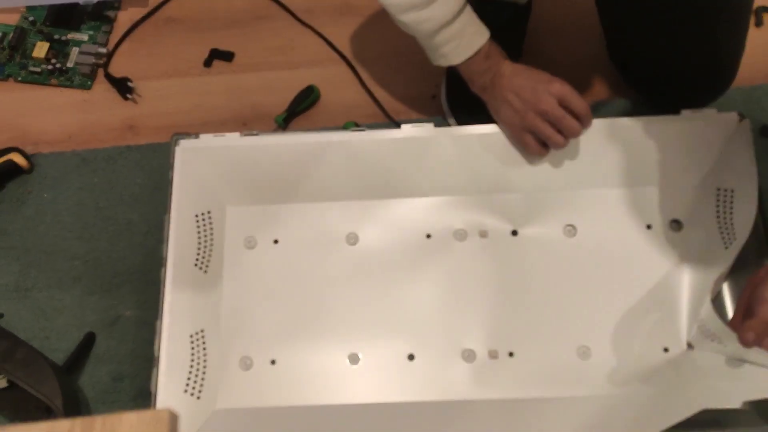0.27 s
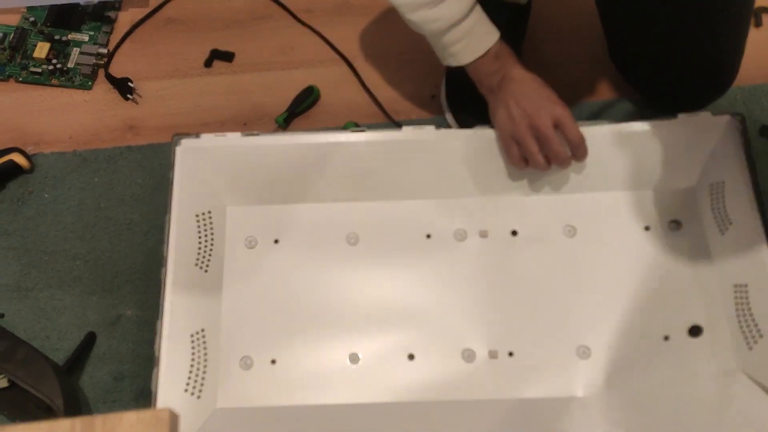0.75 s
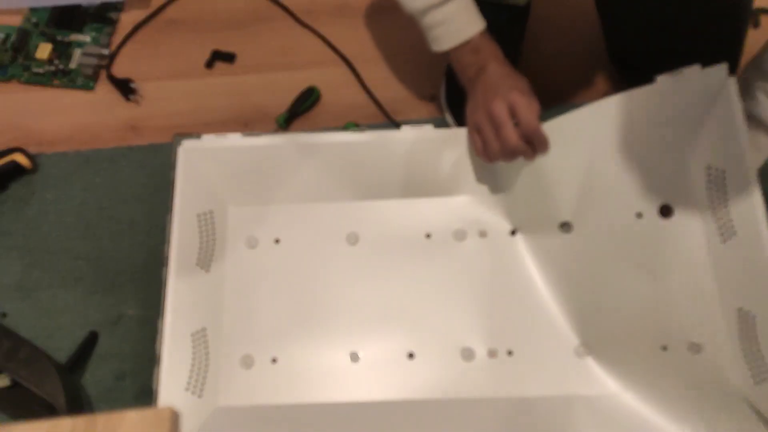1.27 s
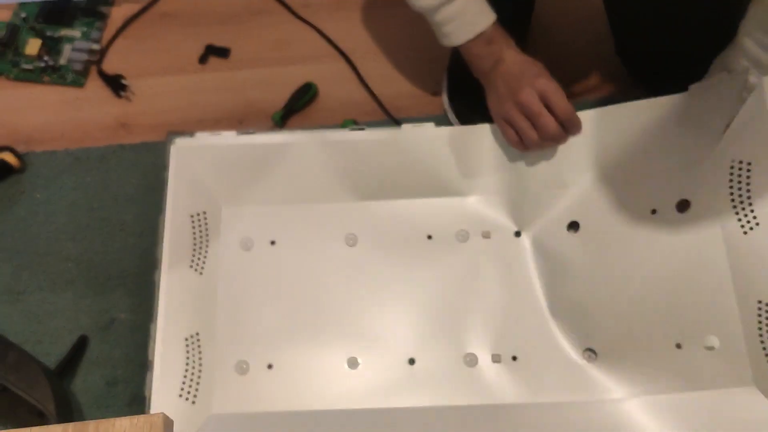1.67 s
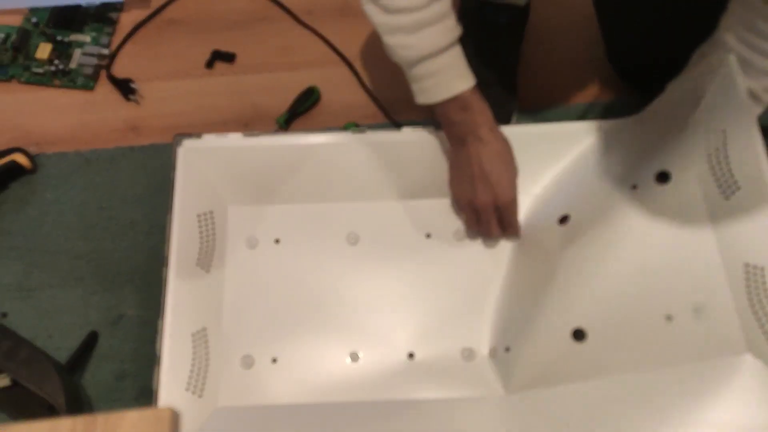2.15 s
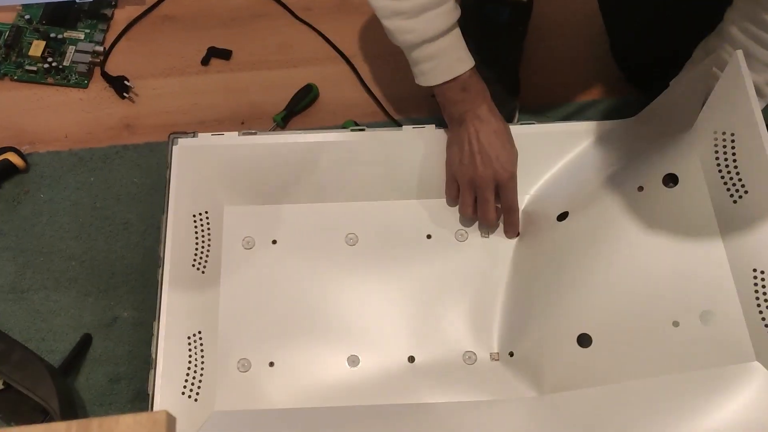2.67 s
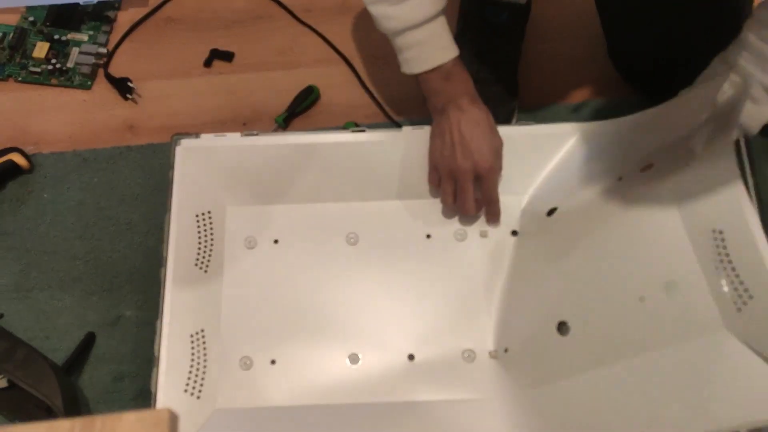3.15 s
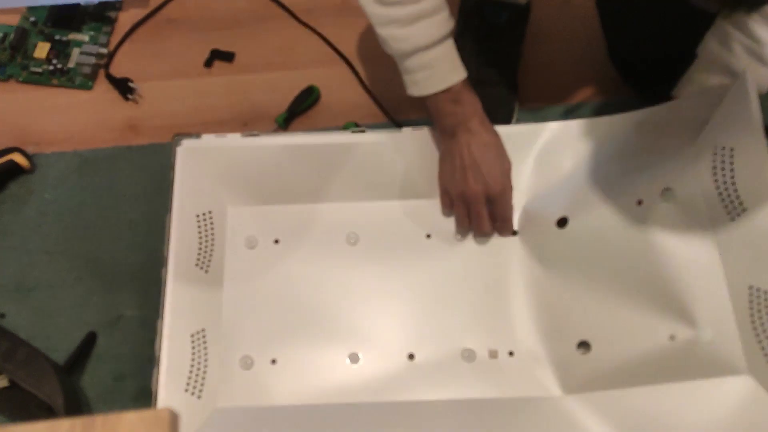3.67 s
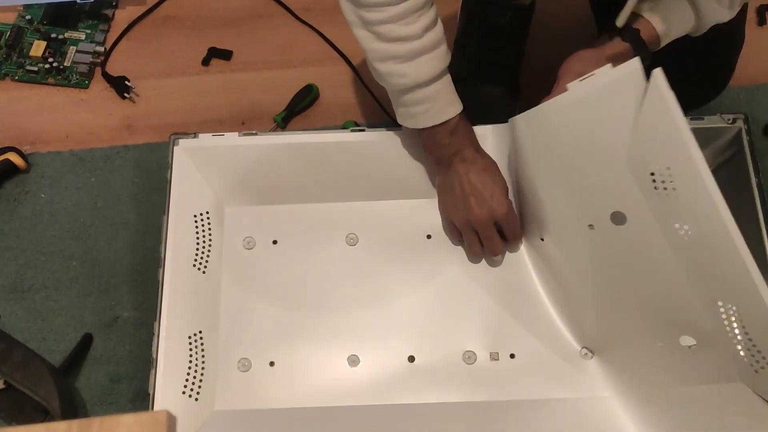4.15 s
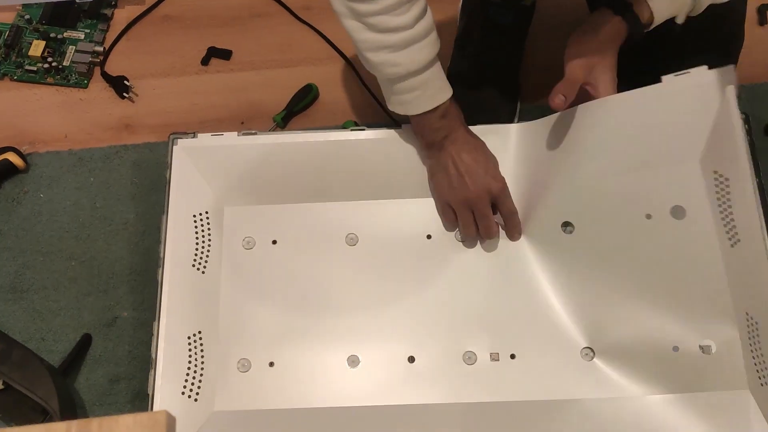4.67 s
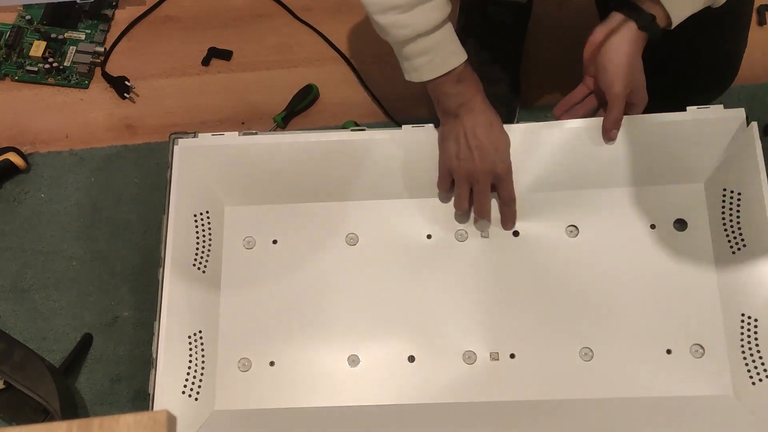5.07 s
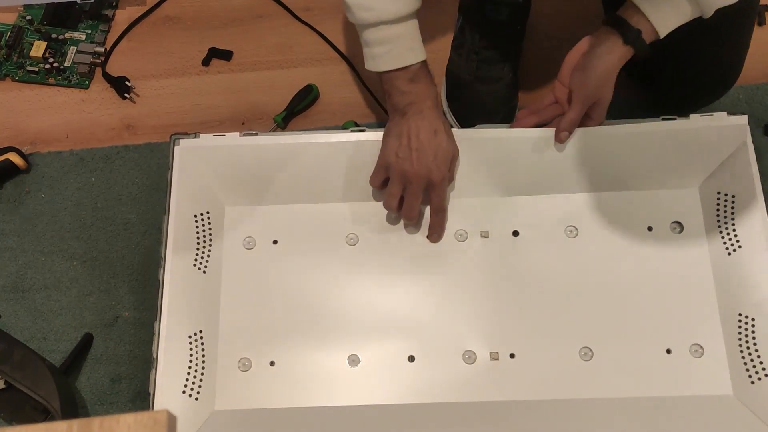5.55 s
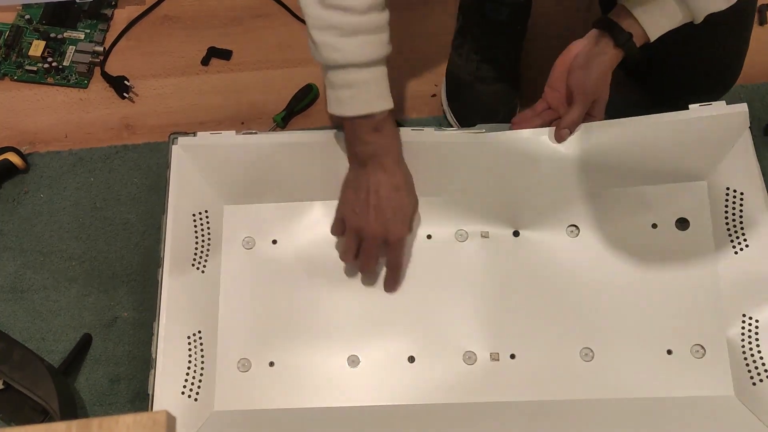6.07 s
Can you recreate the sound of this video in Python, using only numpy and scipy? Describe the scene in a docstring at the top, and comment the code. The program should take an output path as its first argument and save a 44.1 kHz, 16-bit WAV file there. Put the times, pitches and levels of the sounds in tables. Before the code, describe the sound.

Very close stereo microphones in a small, still room with a short diffuse tail; soft air noise lies underneath. A thin moulded plastic sheet is lifted and flexed by hand. Until 0.4 s there are only faint ticks and slight rustling. From 0.45 to 0.7 s it buckles in quick sharp crackles, then from 0.95 to 1.25 s in a dense cluster of hard, hollow snaps, strongest near 1.2 s. Another tight volley comes at 1.75-1.9 s, with separate cracks around 2.1, 2.2 and 2.55 s. Flapping, creaks and thin rim hisses fill between. From 2.9 to 3.5 s only small soft pops remain. A fast crackling fold runs through at 3.8-3.9 s, then a lull; brief crackles return at 4.6-4.9 s. Quiet ticks follow at 5.2 s, a soft knock near 5.8 s, and a clearer snap at 6.05 s before it settles.

```python
"""Close by in a small room with still air, two hands peel a thin moulded plastic sheet off its metal tray.
After a few faint ticks it buckles in dense clusters of hard snaps, each sending bending waves between its edges.
Sparser, mostly softer snaps follow as it is flexed and laid down; a late fold runs through it as a fast crackle.
Throughout it flaps and creaks, its rim slides with a fine hiss and now and then it knocks softly.
The room answers with a short diffuse tail, and two close microphone ports pick up the whole."""
import sys
import numpy as np
from scipy import signal
from scipy.fft import rfft, irfft, next_fast_len
from scipy.io import wavfile

SR = 44100
rng = np.random.default_rng(int(sys.argv[2]) if len(sys.argv) > 2 else 0)


def generate_wav(signal):
    """Clip the signal to [-1, 1] and save it as 16-bit WAV at the path in sys.argv[1]."""
    frames = np.transpose(np.atleast_2d(signal))
    scaled = np.clip(frames, -1, 1) * 32767
    pcm = np.round(scaled).astype(np.int16)
    wavfile.write(sys.argv[1], SR, pcm)


N = 277830  # length in samples

# Colour of the still air. Each row: frequency in Hz, relative level in dB.
AIR_COLOUR = [(25, -14), (60, -14), (130, -4), (280, -3.5), (700, -9), (1900, -7.5), (2800, -16),
              (4200, -21.5), (6800, -17.5), (9500, -25), (11300, -25), (12300, -59)]
# Decay of the room. Each row: frequency in Hz, time to fall by 60 dB in s.
ROOM_DECAY = [(150, 0.3), (400, 0.68), (1040, 0.23), (2760, .42), (7280, 0.34), (12000, 0.13)]
# Width of scattered sound between the microphone ports. Each row: frequency in Hz, gain of the side signal in dB.
PORT_WIDTH = [(60, -1), (130, -1.5), (300, -16.5), (700, -5.5), (1400, -3), (2800, 0), (6000, -1)]
# Standing waves of the whole sheet. Each row: frequency in Hz, relative level in dB.
SHEET_MODES = [(206, 5), (343, -5), (446, -6), (537, -5), (672, -1), (745, 1), (878, 3), (983, 0),
               (1176, 1)]
# How hard the hands work the sheet. Each row: time in s, relative bending in dB, relative sliding in dB.
HAND_EFFORT = [(0.0, -56, -59.5), (0.31, -56.5, -61.5), (0.41, -63.5, -69), (0.5, -42.5, -57),
               (1.3, -51, -60.5), (1.7, -55, -59.5), (2.05, -48, -58), (2.47, -52, -64.5), (2.7, -48, -63),
               (2.9, -53.5, -59), (3.75, -52, -60), (4.22, -59.5, -56.5), (4.32, -64, -76),
               (4.55, -63.5, -72), (4.8, -47.5, -64), (5.1, -59.5, -70), (5.25, -52.5, -57.5),
               (5.42, -70.5, -63), (5.68, -63, -63.5), (5.82, -56, -58.5), (6.29, -59, -58)]
# The rim scrapes along the tray. Each row: start in s, length in s, peak level in dB.
RIM_SCRAPES = [(0.478, 0.12, -44), (0.995, 0.17, -45), (1.477, 0.2, -54), (2.772, 0.12, -50),
               (3.777, 0.14, -42), (4.82, 0.26, -54)]
# Colours of the flapping, the creaking and the sliding. Each row: frequency in Hz, relative level in dB.
FLAP_COLOUR = [(30, -23.5), (90, -14), (160, -8.5), (210, -1), (350, 2.5), (550, -3), (900, -11.5),
               (3000, -67.5)]
CREAK_COLOUR = [(100, -45), (350, -6), (600, 0), (1200, 2.5), (2100, -0.5), (2800, -14), (4200, -20.5),
                (9000, -58)]
SLIDE_COLOUR = [(800, -28), (2500, 5), (4200, -3.5), (5500, 3.5), (7000, 7.5), (8200, -3), (9800, -17),
                (11400, -11), (12200, -59), (15000, -31)]
# Soft knocks of fingers and rim on the sheet. Each row: start in s, relative level in dB, pitch in Hz.
SOFT_KNOCKS = [(0.901, -41, 340), (1.372, -38, 268), (1.6, -47, 422), (2.737, -46.5, 546),
               (3.284, -53, 252), (3.647, -47, 328), (3.71, -48.5, 230), (5.221, -46.5, 320),
               (5.774, -34, 379), (5.932, -48, 335), (5.964, -44, 336)]
# Colour of a snap. Each row: frequency in Hz, relative level in dB.
SNAP_COLOUR = [(40, -32), (110, -19), (170, -17.5), (210, 0.5), (500, -0.5), (2050, -2), (2500, -8),
               (3200, -9.5), (4100, -18), (6800, -10.5), (8200, -23.5), (10000, -42), (11500, -38),
               (12300, -54), (15000, -60)]
# Ringing of gentle and hard buckles. Each row: relative level of the buckle in dB,
# ringing against the first pulse in dB.
BUCKLE_RINGING = [(-37, 6), (-13.5, 0)]
# Folds that travel in a run of buckles. Each row: start in s, length in s, relative level in dB,
# pitch of the bend in Hz, relative low thud in dB, relative crisp crack in dB.
TRAVELLING_FOLDS = [(0.443, 0.037, -34.5, 1560, -12.5, -29), (0.504, 0.054, -35, 1010, -4, -19),
                    (0.597, 0.055, -33, 1500, -19, -11.5), (3.804, 0.12, -20, 1460, -18, -26.5),
                    (4.631, 0.075, -25.5, 1700, -18, -31), (4.86, 0.062, -30.5, 1300, -14, -28.5)]
# Single buckles of the sheet. Each row: time in s, relative level in dB, pitch of the bend in Hz,
# relative low thud in dB, relative crisp crack in dB.
SINGLE_SNAPS = [(0.169, -40.5, 1270, -8, -32), (0.257, -46, 523, -9, -20), (0.497, -26.5, 720, -17, -21),
                (0.566, -16.5, 1260, -28, -11.5), (0.671, -27.5, 990, -38, -17),
                (0.776, -30.5, 1310, -8, -16.5), (0.879, -37, 1400, -19, -29), (0.903, -37, 1600, -11, -35),
                (0.961, -21.5, 1660, -19, -22.5), (1.021, -26, 1410, -10, -14),
                (1.032, -19.5, 1290, -12, -25.5), (1.169, -23.5, 1100, -42, -14),
                (1.179, -17.5, 1060, -14, -13.5), (1.192, -12.5, 1030, -10.5, -11),
                (1.245, -20.5, 990, -14.5, -22), (1.367, -33, 690, -7, -30), (1.602, -36.5, 790, -5.5, -19),
                (1.676, -40, 1650, 4, -28), (1.755, -36, 1100, 3, -21), (1.776, -24.5, 660, 1.5, -10),
                (1.783, -17, 1160, -11.5, -17.5), (1.858, -16.5, 1760, -15.5, -14),
                (1.871, -24.5, 1190, 1, -8), (1.888, -13, 1850, -21.5, -12.5), (1.901, -21, 1170, -26, -17),
                (2.067, -20, 1950, -19, -13), (2.209, -21.5, 710, -30.5, -24.5),
                (2.331, -37.5, 660, -11, -11), (2.489, -42.5, 860, -6, -41), (2.532, -31, 2140, -12, -8),
                (2.564, -18, 2000, -13, -8.5), (2.574, -23, 805, -22, -17), (2.952, -35, 710, -11, -40),
                (3.043, -40.5, 730, -25, -20), (3.112, -44.5, 1700, -15, -13), (3.173, -42.5, 744, -8, -36),
                (3.246, -36.5, 1980, -19, -15), (3.413, -31.5, 1710, -9, -53), (3.440, -37.5, 670, -8, -43),
                (3.787, -26.5, 1920, -11, -13.5), (3.917, -28.5, 940, -16, -38),
                (3.948, -28.5, 880, -14, -36), (4.380, -43, 755, -3.5, -48),
                (4.586, -41.5, 2000, -1.5, -33), (4.645, -22, 2010, -31, -22), (4.690, -26, 910, -22, -38),
                (4.737, -34, 960, -33, -13.5), (5.238, -35, 1850, -7, -24), (5.250, -40, 1300, 1, -33),
                (5.721, -31, 1340, -9.5, -31), (5.922, -39, 1300, -9, -48), (5.976, -30.5, 1260, -19, -23),
                (6.051, -22.5, 1740, -10.5, -11.5)]

AIR_DB = -68  # level ahead of the port gains
LEAD_S = .02  # how long a fold strains before it gives way
WIND_UP_S = .1  # how long before a buckle the unrest can begin
WIND_UP_T60, SETTLE_T60 = 0.097, 0.58  # s for 60 dB, up to a buckle and after it
EDGE_HZ = 15400  # upper band limit of the recorder


def gain_of(db):
    """Decibels to a factor."""
    return 10 ** (np.asarray(db) / 20)


def together(*levels_db):
    """The level of several unrelated parts, in dB: their powers add."""
    return 10 * np.log10(sum(gain_of(db) ** 2 for db in levels_db))


def evened(x):
    """Scales to rms 1."""
    return x / np.sqrt(np.mean(x ** 2) + 1e-20)


def unit(x):
    """Scales each row to energy 1."""
    return x / np.sqrt(np.sum(x ** 2, -1, keepdims=True) + 1e-20)


def read(points, hz):
    """Reads a table on a log-frequency axis."""
    f, value = np.transpose(points)
    return np.interp(np.log(hz + 1), np.log(f + 1), value)


def add(mix, s, sound):
    """Adds a sound to the mix at time s."""
    start = max(round(s * SR), 0)
    part = mix[:, start:][:, :sound.shape[1]]
    part += sound[:, :part.shape[1]]


def bins(size=2048):
    """The frequencies on which colours are drawn, in Hz."""
    return np.fft.rfftfreq(size, 1 / SR)


def coloured(x, db):
    """Causal minimum-phase filter of mean power gain 1, shaped by the given dB on bins()."""
    cepstrum = irfft(np.log(gain_of(db)))
    half = len(cepstrum) // 2
    # folding the cepstrum onto positive times makes the response causal
    cepstrum[1:half] *= 2
    cepstrum[half + 1:] = 0
    response = unit(irfft(np.exp(rfft(cepstrum))))
    return signal.oaconvolve(x, response[None], axes=1)[:, :x.shape[1]]


def echoes(length, per_s):
    """Sparse taps of random sign, for mid and side."""
    signs = rng.choice([-1., 1.], (2, length))
    return signs * (rng.random((2, length)) < per_s / SR)


def still_air():
    """The air of the place: steady coloured noise, independent in mid and side."""
    noise = rng.standard_normal((2, N))
    return gain_of(AIR_DB) * evened(coloured(noise, read(AIR_COLOUR, bins())))


def room(x, build_s=0.0017):
    """A diffuse tail that builds up quickly and dies band by band."""
    hz, t, z = signal.stft(echoes(SR * 3 // 4, 5000), SR, nperseg=256)
    decay = gain_of(-60 * t / read(ROOM_DECAY, hz)[:, None])
    z = z * decay * (1 - np.exp(-(t / build_s) ** 2))
    tail = unit(signal.istft(z, SR, nperseg=256)[1])
    return signal.fftconvolve(x[:1], tail, axes=1)[:, :N]


def standing(x, level_db=-15, t60_at_200=0.29):
    """The buckles leave standing waves in the sheet; higher ones die sooner."""
    t = np.arange(SR // 2) / SR
    ring = np.zeros(len(t))
    for hz, db in SHEET_MODES:
        fall_db = 60 * t / t60_at_200 * (hz / 200) ** 0.2
        ring += gain_of(db - fall_db) * np.sin(2 * np.pi * (hz * t + rng.random()))
    rung = signal.fftconvolve(x, ring[None], axes=1)[:, :N]
    return gain_of(level_db) * x.std() * evened(rung)  # level against the buckles


def friction(level_db, colour, slips_per_s, spread_db, ring_t60, count=4):
    """Tiny slips of uneven size at a few spots of the sheet, each spot with its own short scatter."""
    sizes = gain_of(spread_db * np.minimum(rng.exponential(1, N), 4))
    slips = sizes * rng.choice([-1., 1.], N) * (rng.random(N) < slips_per_s / SR)
    spot = rng.integers(0, count, N)
    t = np.arange(SR // 14) / SR
    grains = 0
    for k in range(count):
        scatter = echoes(len(t), 5000) * gain_of(-60 * t / ring_t60)
        grains = grains + signal.oaconvolve((slips * (spot == k))[None], scatter, axes=1)
    return gain_of(level_db) * evened(coloured(grains[:, :N], read(colour, bins())))


def settling(blows):
    """Level of the unrest in the sheet: it builds quickly up to each buckle and dies away after it."""
    power = np.zeros((1, N))
    t = np.arange(SR)[None] / SR - WIND_UP_S
    shape_db = -60 * np.maximum(-t / WIND_UP_T60, t / SETTLE_T60)
    for s, db, *_ in blows:
        add(power, s - WIND_UP_S, gain_of(db + shape_db) ** 2)
    return 10 * np.log10(power[0] + 1e-14)


def scraping(peak_share=0.14):
    """Level of the rim scrapes in dB: each swells quickly and eases off."""
    t, size = np.arange(N) / SR, np.zeros(N)
    for s, length, db in RIM_SCRAPES:
        size += gain_of(db) * np.interp(t, [s, s + peak_share * length, s + length], [0, 1, 0])
    return 20 * np.log10(size + 1e-7)


def handling(blows, flap_db=-5.0, creak_db=-1.0, slide_db=-2.5,
             settle_flap_db=-31, settle_creak_db=-22, settle_slide_db=-33):
    """The loose sheet flaps, its folds creak and its rim slides, with the hands' effort and around every buckle."""
    s, *columns = np.transpose(HAND_EFFORT)
    bending, sliding = (np.interp(np.arange(N) / SR, s, c) for c in columns)
    unrest = settling(blows)
    flap = together(bending + flap_db, unrest + settle_flap_db)
    creak = together(bending + creak_db, unrest + settle_creak_db)
    slide = together(sliding + slide_db, unrest + settle_slide_db, scraping())
    return (friction(flap, FLAP_COLOUR, slips_per_s=160, spread_db=2, ring_t60=0.099)
            + friction(creak, CREAK_COLOUR, slips_per_s=240, spread_db=3.0, ring_t60=0.13)
            + friction(slide, SLIDE_COLOUR, slips_per_s=2500, spread_db=0.5, ring_t60=0.02))


def knocks(level_db=4, swell_s=0.0042):
    """A soft push rings one broad, well damped panel of the sheet."""
    out, t = np.zeros((2, N)), np.arange(SR // 10) / SR
    swell = t / swell_s * np.exp(1 - t / swell_s)  # peaks at swell_s
    for s, db, hz in SOFT_KNOCKS:
        knock = gain_of(db + level_db) * swell * np.sin(2 * np.pi * hz * t)
        add(out, s, np.outer([1, 0], knock))  # mid only
    return out


def run_of_buckles(s, length, db, *colour, count=10, slowing=1.3, peak_share=.28,
                   swell_db=8, fade_db=10, uneven_db=1.6):
    """A travelling fold buckles again and again: it gathers force, then slows and weakens."""
    step = np.arange(count)
    jitter = rng.uniform(-.5, .5, count) * (step > 0)
    along = (step + jitter) / count
    arch_db = np.interp(along, [0, peak_share, 1], [-swell_db, 0, -fade_db])
    levels = db + arch_db + uneven_db * rng.standard_normal(count)
    return [(s + length * a ** slowing, level, *colour) for a, level in zip(along, levels)]


def snap(db, hz, thud_db, crisp_db, bend_db=7, bend_octaves=0.37, ring_t60=0.095, thud_offset_db=10,
         crisp_offset_db=14, strain_db=-11, strain_s=0.026, crack_share=0.44, crack_t60=0.11):
    """One buckle: the fold strains, gives way in a first pulse, and bending waves come back from the edges."""
    t, f = np.arange(SR // 5) / SR - LEAD_S, bins()
    # gentle buckles ring on, hard ones have a stronger first pulse
    ringing = gain_of(np.interp(db, *np.transpose(BUCKLE_RINGING)))
    whole = np.hypot(1, ringing)
    first = np.zeros((2, len(t)))
    first[0, round(LEAD_S * SR)] = 1
    returns = unit(echoes(len(t), 4000) * gain_of(-60 * abs(t) / ring_t60) * (t > .001))
    waves = first + ringing * returns
    # the treble is a spray of fine cracks, which starts just before the fold gives way
    strain = gain_of(strain_db) * unit(echoes(len(t), 4000) * np.exp(-abs(t) / strain_s) * (t < 0))
    spray = unit(echoes(len(t), 4000) * gain_of(-60 * abs(t) / crack_t60) * (t > 0))
    cracks = crack_share * first + strain + whole * spray
    lowpass = signal.butter(3, 3600, "low", fs=SR, output="sos")
    highpass = signal.butter(3, 3600, "high", fs=SR, output="sos")
    burst = signal.sosfilt(lowpass, waves) + signal.sosfilt(highpass, cracks)
    low = 1 / (1 + (f / 520) ** 4)
    high = 1 / (1 + (3300 / (f + 1)) ** 5)
    bend = np.exp(-.5 * (np.log2((f + 1) / hz) / bend_octaves) ** 2)  # the buckling patch rings for a few cycles
    colour_db = read(SNAP_COLOUR, f) + bend_db * bend
    colour_db += (thud_db + thud_offset_db) * low + (crisp_db + crisp_offset_db) * high
    return gain_of(db) * coloured(burst / whole, colour_db)


def dispersed(x, delay_s):
    """Bending waves travel with the root of frequency, so treble arrives first; delay_s holds at 1 kHz."""
    size = next_fast_len(N + 4096)
    turns = 2 * delay_s * np.sqrt(1000 * bins(size))
    return irfft(rfft(x, size) * np.exp(-2j * np.pi * turns), size)[:, :N]


def snaps(blows, level_db=22.5, travel_s=0.00161):
    """All buckles, spread in time on their way through the sheet."""
    out = np.zeros((2, N))
    for s, *blow in blows:
        add(out, s - LEAD_S, snap(*blow))
    return gain_of(level_db) * dispersed(out, travel_s)


def ports(x, left_db=-0.8, right_db=-2.5):
    """Mid and side to two close microphone ports; sound reaches the right one slightly earlier."""
    size = next_fast_len(N)
    mid = x[0]
    side = irfft(rfft(x[1], size) * gain_of(read(PORT_WIDTH, bins(size))), size)[:N]
    left = np.pad(mid + side, (4, 0))[:N]  # 4 samples later
    return np.array([gain_of(left_db) * left, gain_of(right_db) * (mid - side)])


def scene(room_db=-6, knock_send_db=-6):
    """The still air, the room and the handled sheet at the two ports."""
    runs = [blow for fold in TRAVELLING_FOLDS for blow in run_of_buckles(*fold)]
    blows = [*SINGLE_SNAPS, *runs]
    buckles, pushes = snaps(blows), knocks()
    tail = gain_of(room_db) * room(buckles + gain_of(knock_send_db) * pushes)
    sheet = buckles + standing(buckles) + pushes + handling(blows)
    return ports(still_air() + tail + sheet)


def record(dry):
    """The band limit of the recorder: a steep linear-phase low-pass."""
    lowpass = signal.firwin(511, EDGE_HZ, window=("kaiser", 9), fs=SR)
    return signal.oaconvolve(dry, lowpass[None], "same")


dry = scene()
out = record(dry)
generate_wav(out)
```